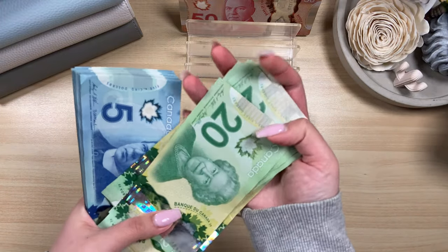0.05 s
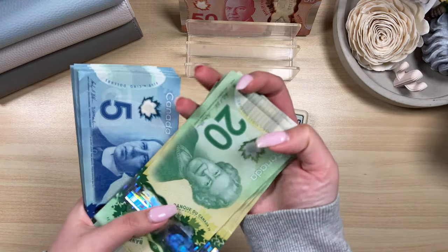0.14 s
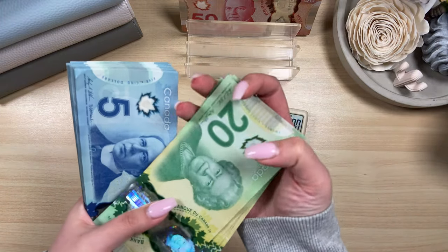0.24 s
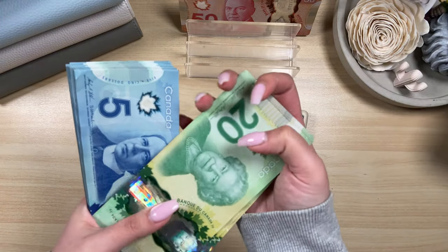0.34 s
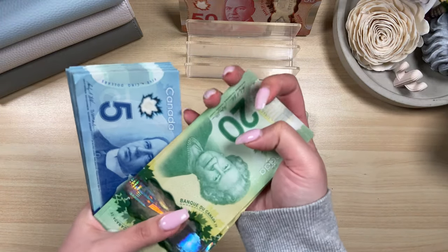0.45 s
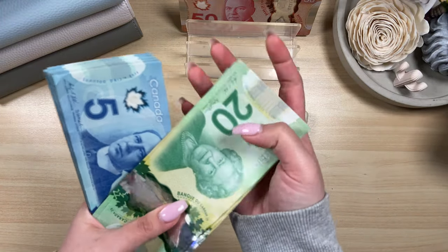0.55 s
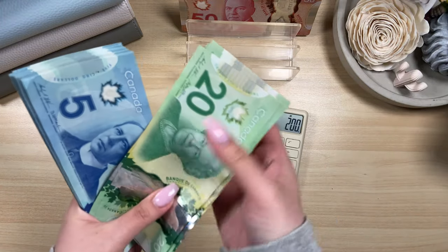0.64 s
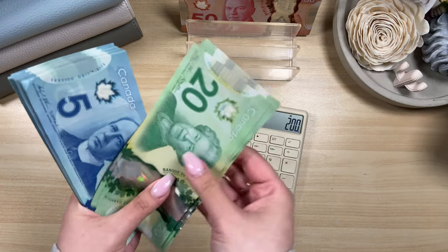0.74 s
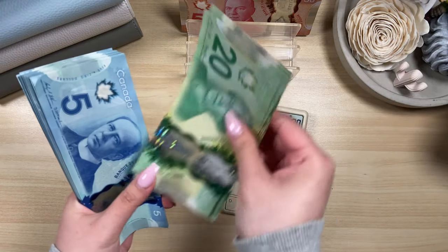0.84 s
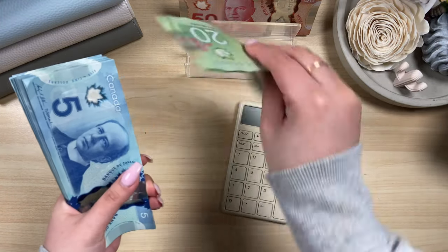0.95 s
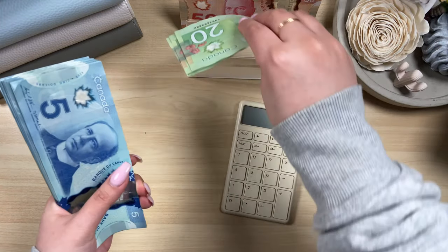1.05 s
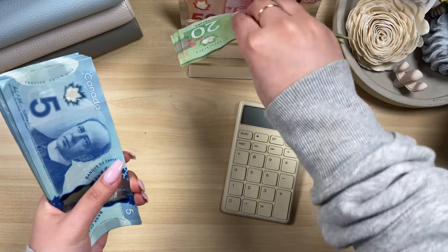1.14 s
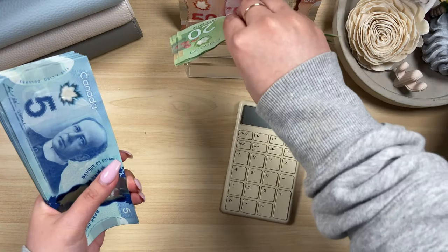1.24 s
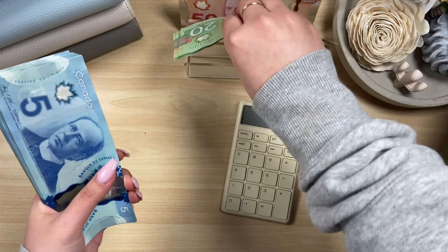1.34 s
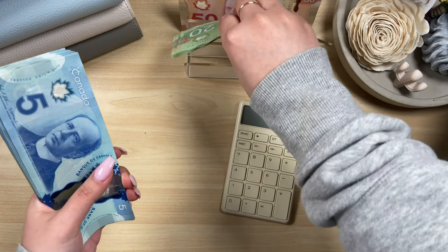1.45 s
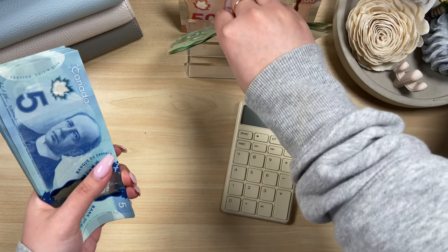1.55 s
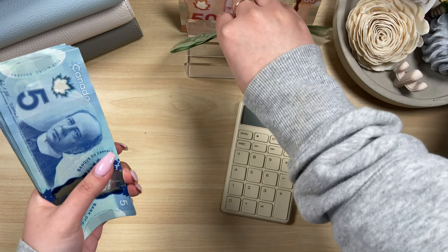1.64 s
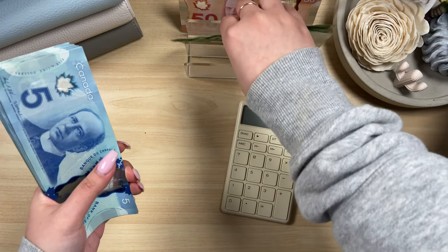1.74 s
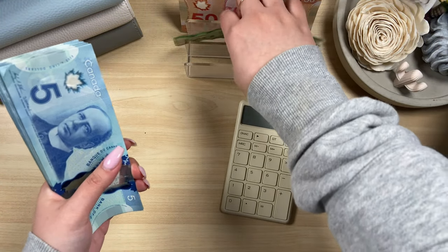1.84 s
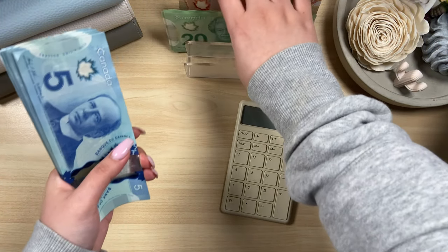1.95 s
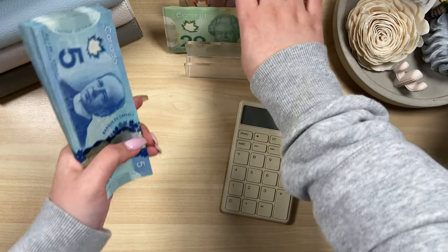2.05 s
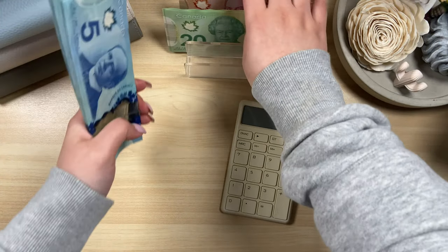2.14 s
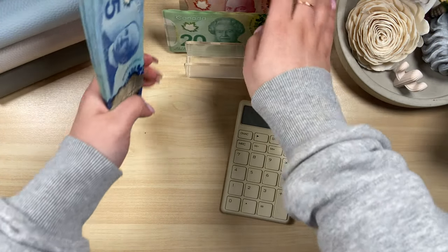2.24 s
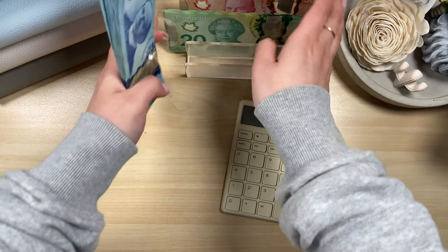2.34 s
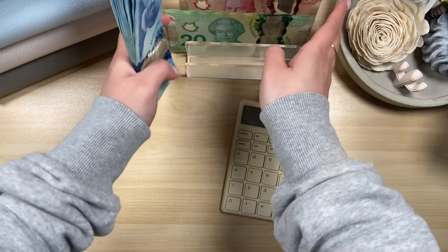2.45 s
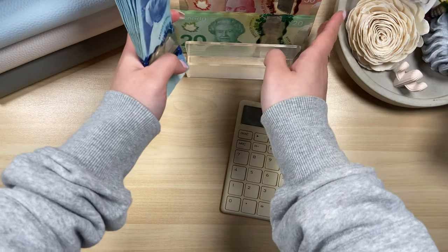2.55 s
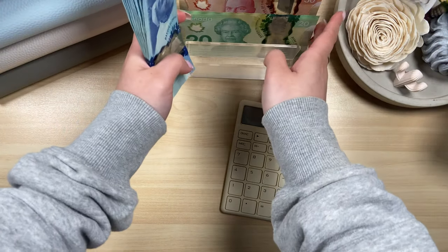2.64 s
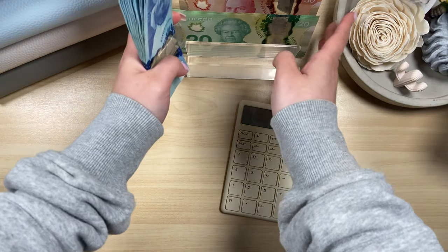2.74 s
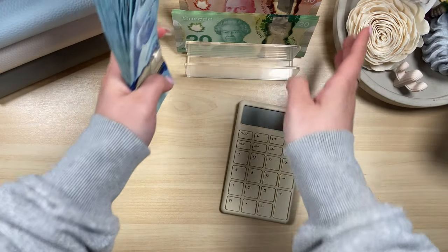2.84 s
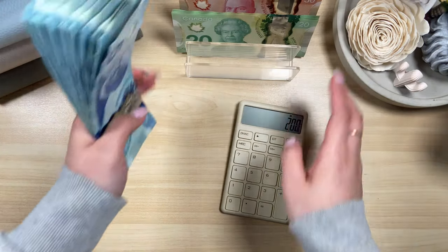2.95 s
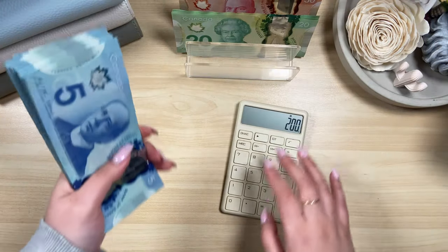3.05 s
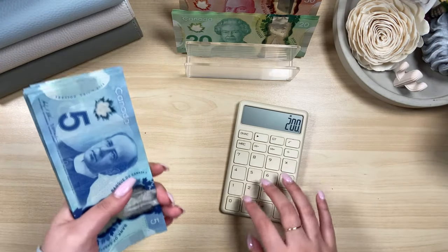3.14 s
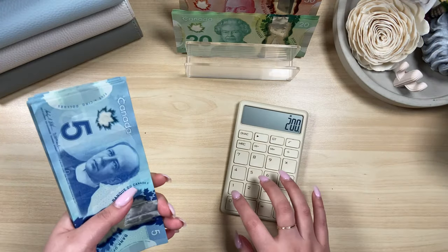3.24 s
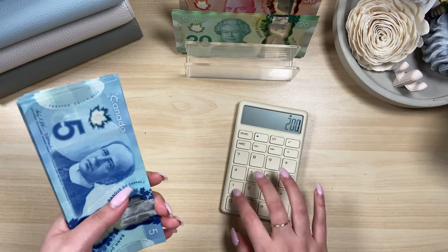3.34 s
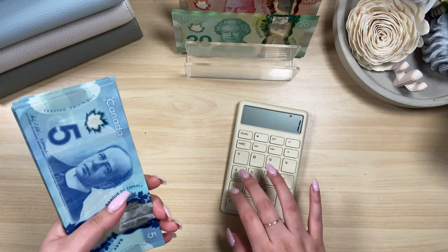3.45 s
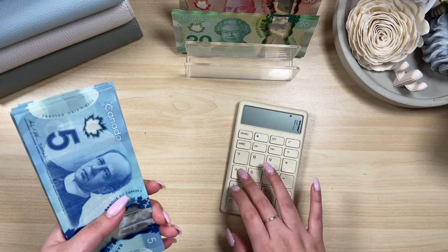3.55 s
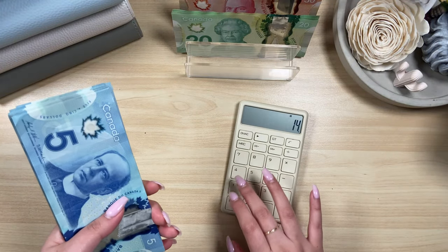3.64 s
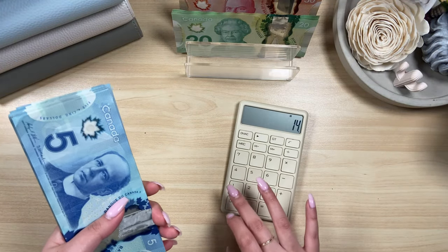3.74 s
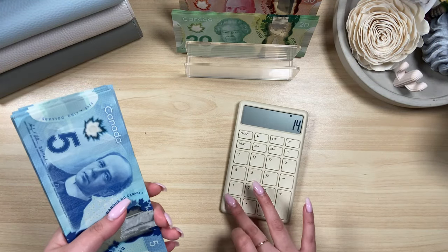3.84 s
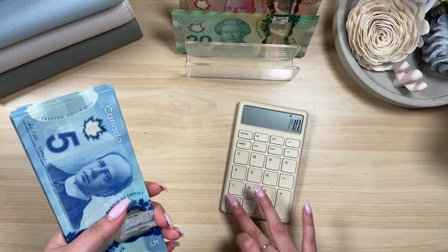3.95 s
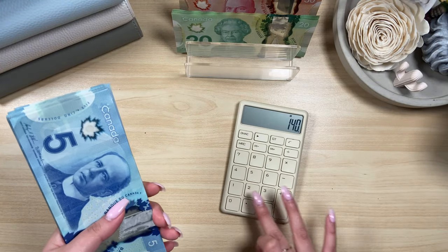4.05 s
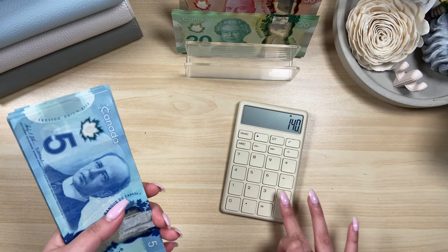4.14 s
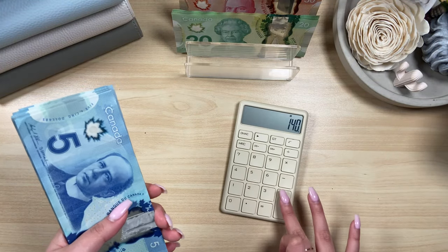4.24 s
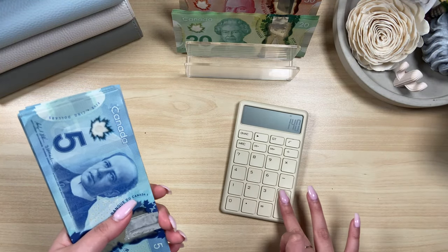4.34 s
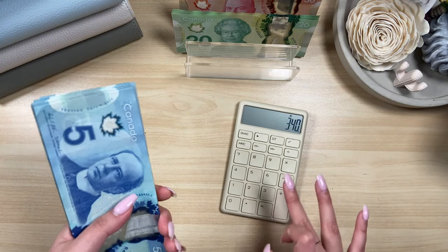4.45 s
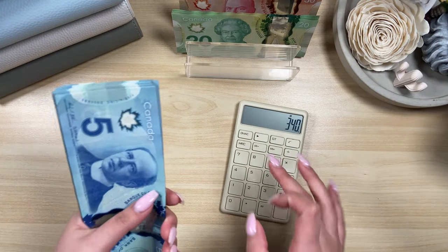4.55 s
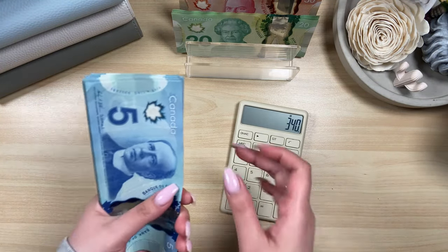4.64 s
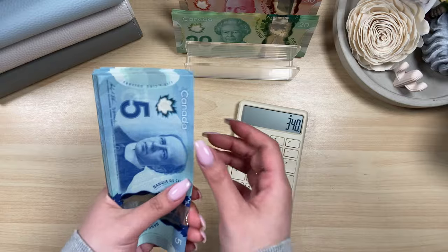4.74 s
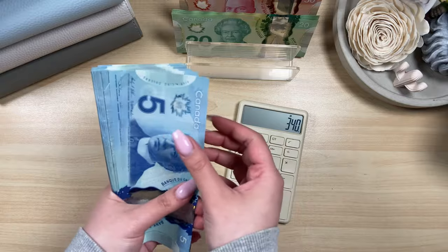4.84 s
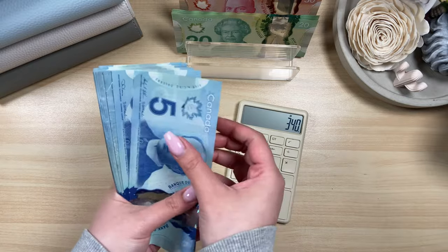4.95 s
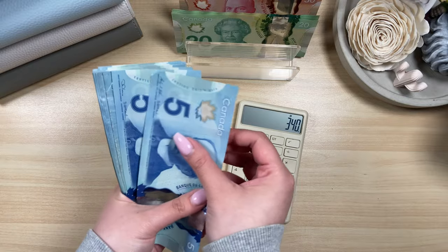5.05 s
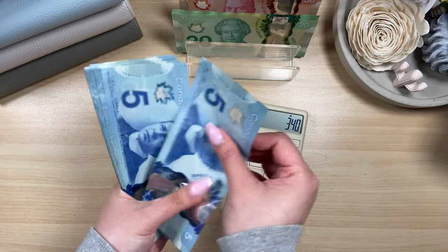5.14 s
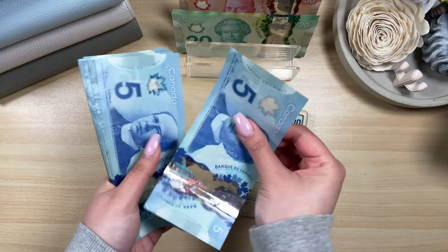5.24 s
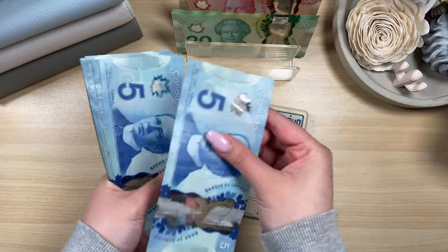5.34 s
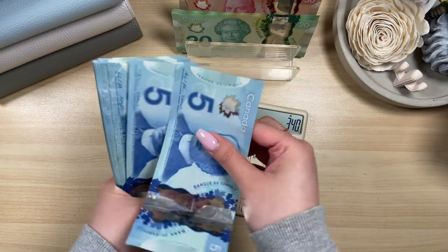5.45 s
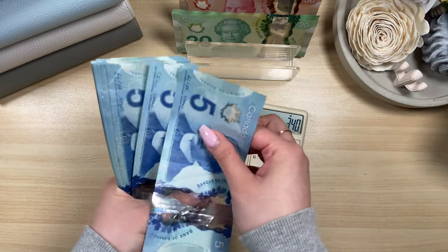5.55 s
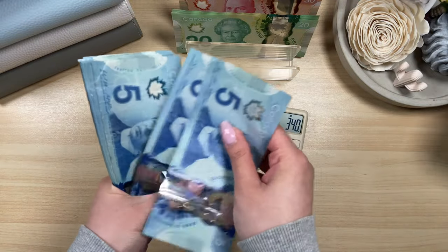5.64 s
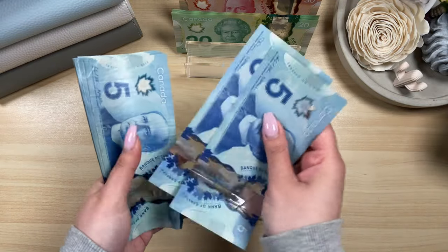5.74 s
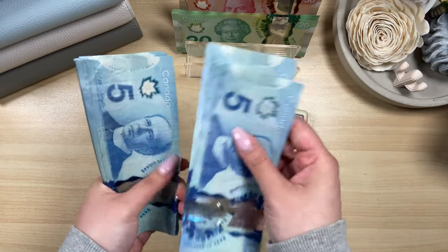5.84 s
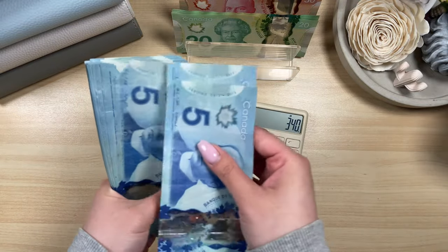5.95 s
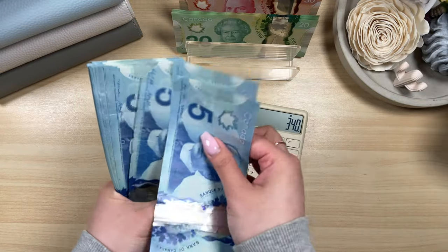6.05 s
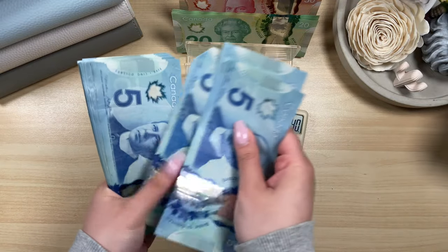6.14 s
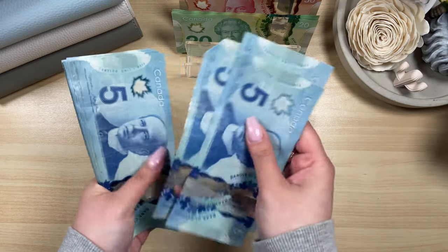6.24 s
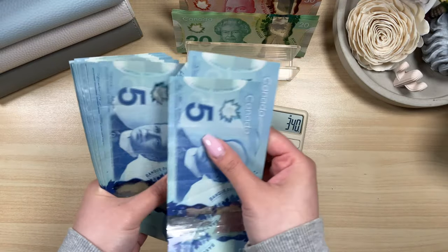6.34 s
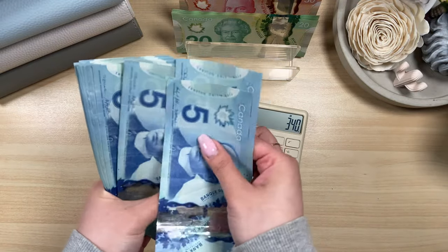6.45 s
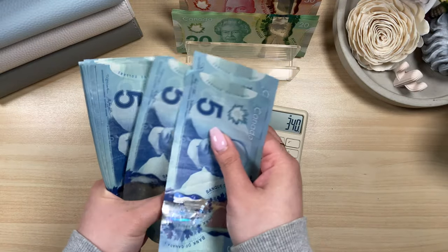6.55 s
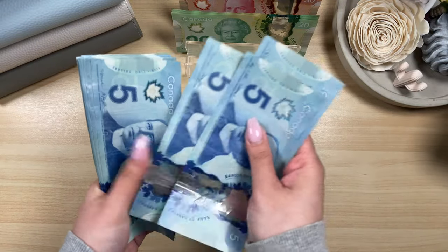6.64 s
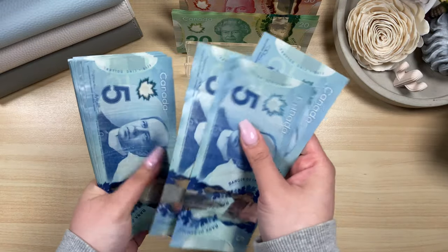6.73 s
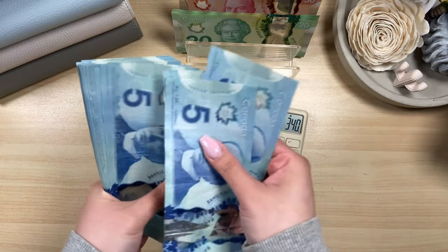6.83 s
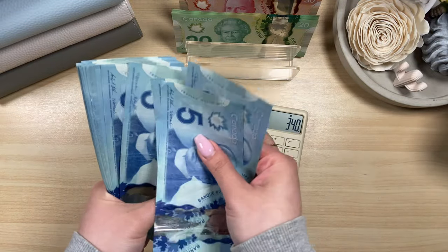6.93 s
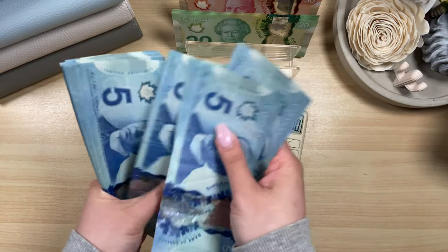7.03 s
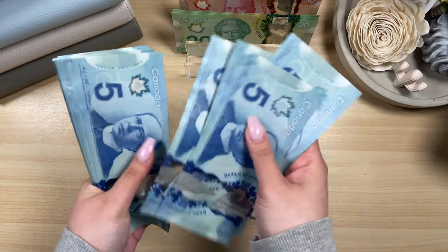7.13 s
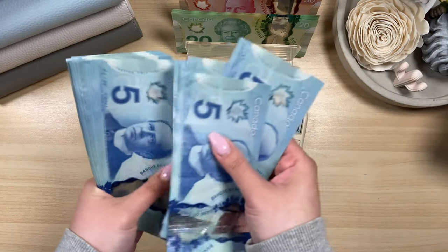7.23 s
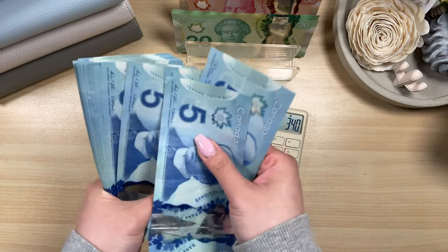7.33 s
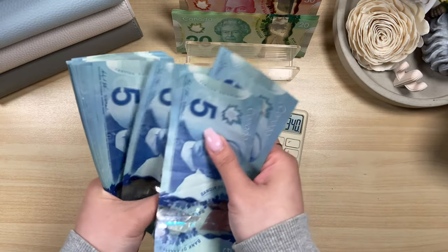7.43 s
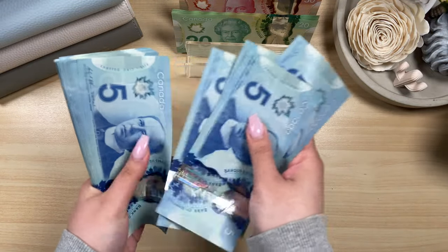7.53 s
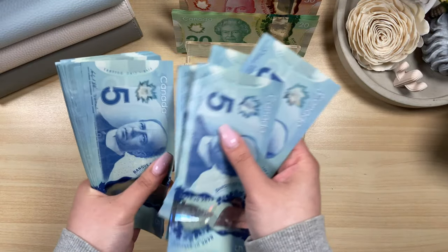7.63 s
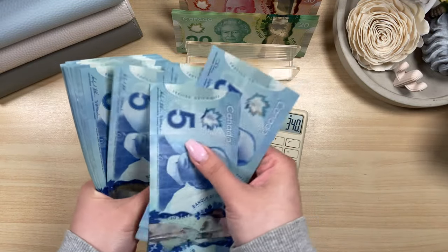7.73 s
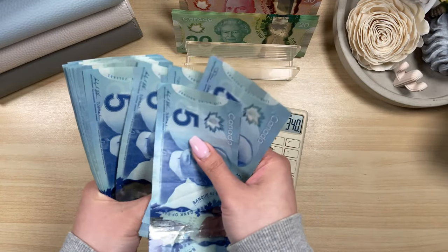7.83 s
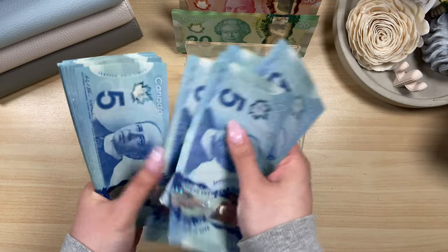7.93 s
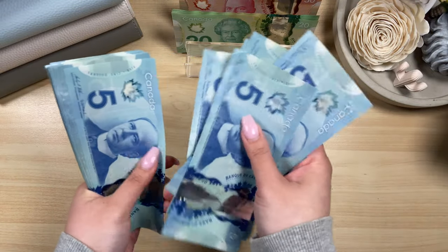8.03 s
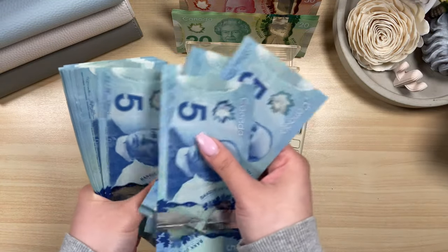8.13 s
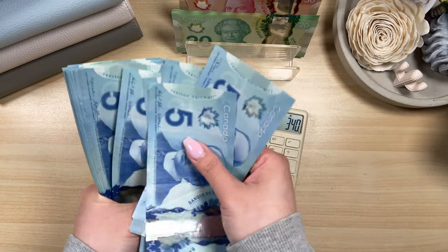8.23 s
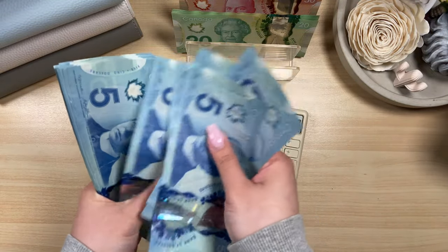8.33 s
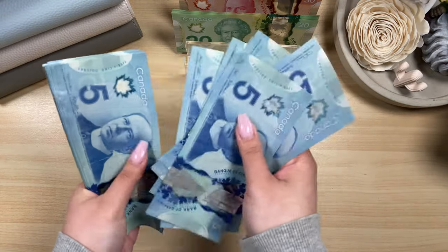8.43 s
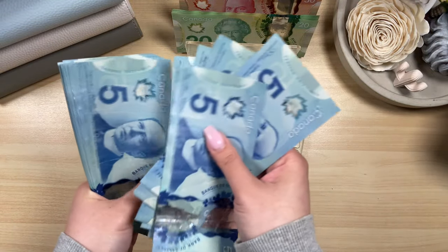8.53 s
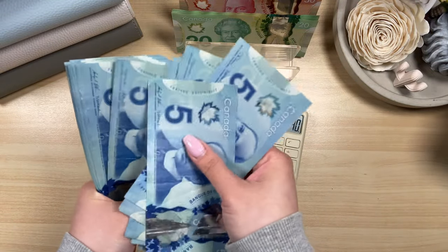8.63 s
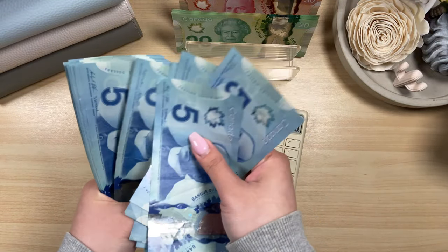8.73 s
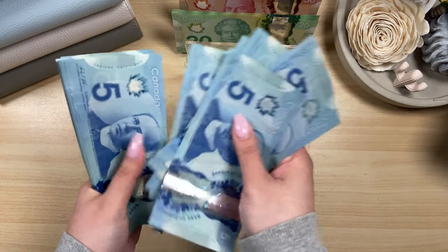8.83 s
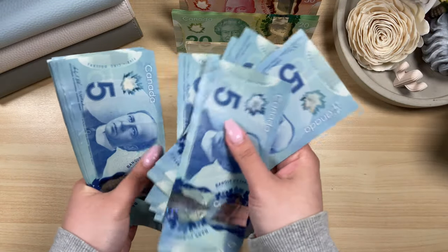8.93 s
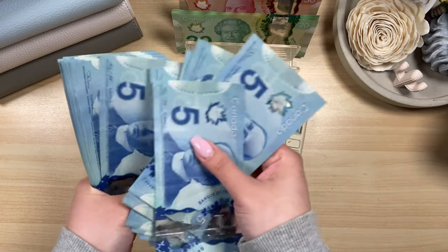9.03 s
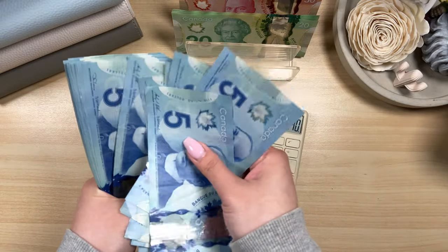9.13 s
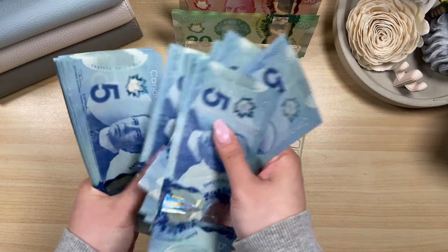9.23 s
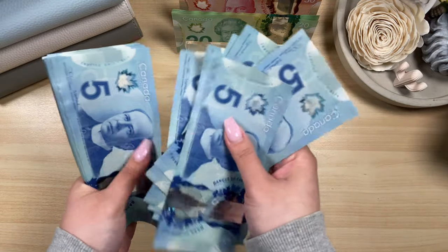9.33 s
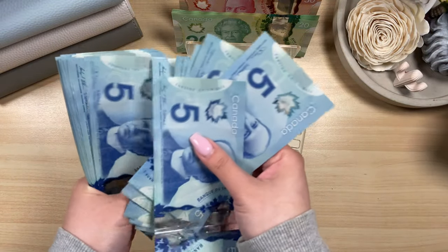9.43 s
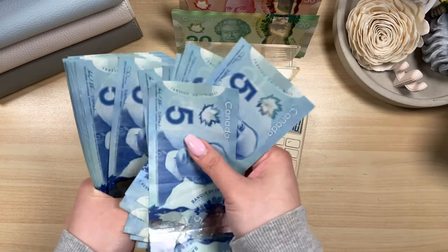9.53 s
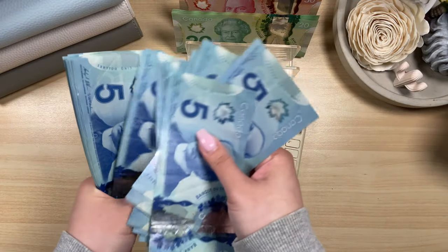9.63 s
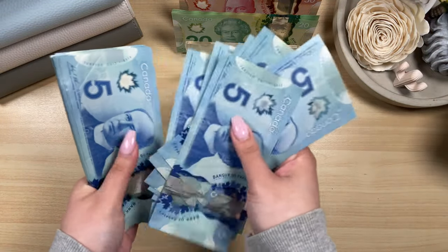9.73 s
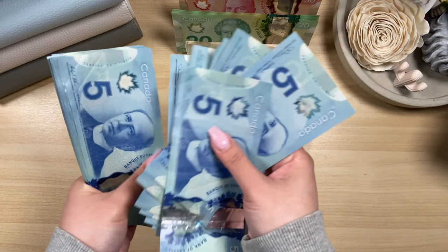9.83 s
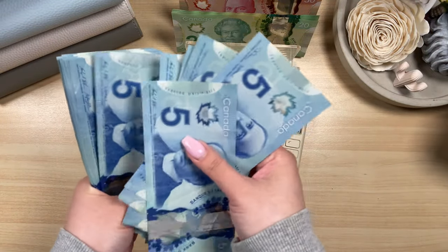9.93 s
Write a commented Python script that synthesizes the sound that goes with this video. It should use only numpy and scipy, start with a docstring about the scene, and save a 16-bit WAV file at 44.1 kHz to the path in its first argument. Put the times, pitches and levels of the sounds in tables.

```python
"""Counting plastic banknotes at a desk

Hands count plastic banknotes over a wooden desk under a phone. The notes slide (flickering noise), crackle
(random ticks), snap and flap (short noise bursts with a crack). A bundle knocks into a clear plastic rack and
fingernails tap calculator keys: bursts that ring decaying modes. A low wavering hum and faint air fill the room.
"""
import sys
import numpy as np
from scipy import signal
from scipy.fft import rfft, irfft, next_fast_len
from scipy.io import wavfile
from scipy.ndimage import uniform_filter1d

SR = 44100
rng = np.random.default_rng(int(sys.argv[2]) if len(sys.argv) > 2 else 0)


def digitize_waveform(pressure):
    """Quantize a signal to 16-bit integers and store it at the path in sys.argv[1].

    Rows of a 2-D input are taken as channels; values are limited to [-1, 1].
    """
    field = np.atleast_2d(pressure).T
    bounded = np.clip(field, -1, 1)
    quanta = np.round(bounded * 32767).astype(np.int16)
    wavfile.write(sys.argv[1], SR, quanta)


N = 440118


def undb(db):
    """Decibels to an amplitude factor."""
    return 10 ** (np.asarray(db) / 20)


def unit(x):
    """Scale to an rms of 1."""
    return x / np.sqrt(np.mean(x ** 2))


def band(x, lo_hz, hi_hz, order=2):
    """Butterworth band-pass."""
    return signal.sosfilt(signal.butter(order, [lo_hz, hi_hz], "band", fs=SR, output="sos"), x)


def walk(rate):
    """Random drift around zero, with a new target `rate` times a second and straight ramps between."""
    hold = int(SR / rate)
    targets = rng.standard_normal(N // hold + 1)
    return 2.0 * uniform_filter1d(np.repeat(targets, hold), hold)[:N]


def columns(table):
    """Curves, one per column after the time, read at every sample."""
    time_s, *curves = np.transpose(table)
    return [np.interp(np.arange(N) / SR, time_s, curve) for curve in curves]


def window(hz, lo_hz, hi_hz, sharp=np.sqrt(.5)):
    """Response of a causal band-pass, 12 dB an octave on each side; sharp edges resonate."""
    low, high = 1j * hz / hi_hz, lo_hz / (1j * hz)
    return 1 / ((1 + low / sharp + low ** 2) * (1 + high / sharp + high ** 2))


def place(x, pan_db):
    """A source left or right of the phone; pan_db is left minus right."""
    return x * undb(np.array([[pan_db], [-pan_db]]) / 2)


def blows(table, spread, edge_hz, edge_slow, crack_db, modes=(), ring_db=0, detune=0, sharp=0.56, sweep_ms=0):
    """Each row: a noise burst that builds up, cracks and dies, a second band at the edge, and a ringing body."""
    size, lead = 4096, 768  # samples in a burst, and samples ahead of its peak
    spot_db_per_octave = 16  # modes fade with distance from the favoured pitch
    pan_spread_db, lag_spread_s = 1.45, 10e-6 / 1.2  # left against right, drawn once per burst
    time_s, db, hz, edge_db, rise_ms, fall_ms, *spot = np.transpose(table)[:, :, None]
    spot_db, spot_hz = spot or (0, hz)
    count = len(table)
    t = (np.arange(size) - lead) / SR
    bins = (np.arange(size // 2 + 1) + 1e-3) * SR / size  # Hz, kept off zero
    click = rfft(np.where(np.arange(size) == lead, undb(crack_db), 0))  # the sharp instant of the burst

    def part(gain, slow, growth_db):
        """One band of noise and click: growth_db over the build-up, then 60 dB lost over slow * fall_ms."""
        growth = 1000 * growth_db * t / rise_ms
        fall = -60 * 1000 * t / (fall_ms * slow)
        hiss = irfft(rfft(rng.standard_normal((count, size))) * gain)
        return (hiss * undb(np.where(t < 0, growth, fall)) + irfft(click * gain)) / hiss.std(axis=1, keepdims=True)

    y = part(window(bins, hz / spread, hz * spread, sharp), slow=0.59, growth_db=8.455)
    y += undb(edge_db) * part(window(bins, *edge_hz), edge_slow, growth_db=23.75)
    for mode_hz, mode_db, ring_s in modes:
        level_chance, pitch_chance = rng.standard_normal((2, count, 1))
        distance_db = spot_db_per_octave * abs(np.log2(mode_hz / spot_hz))
        struck_db = ring_db + spot_db + mode_db + 1.3 * level_chance - distance_db
        ring = np.sin(2 * np.pi * mode_hz * (1 + detune * pitch_chance) * t) * (t > 0)
        y += undb(struck_db - 60 * t / ring_s) * ring
    fade = np.clip(np.minimum((t - t[0]) / 0.0096, (t[-1] - t) / .02), 0, 1)
    y = undb(db) * y * fade

    side = rng.standard_normal((count, 1)) * np.array([1, -1])[:, None, None]
    # dispersion: against the centre pitch, lower tones arrive late and higher ones early
    late = np.exp(-2j * np.pi * sweep_ms / 1000 * (2 * np.sqrt(hz * bins) - bins))
    lag = np.exp(1j * np.pi * bins * lag_spread_s * side)
    y = irfft(rfft(y) * late * undb(pan_spread_db * side / 2) * lag)
    out = np.zeros((2, N + size))
    for k, start in enumerate((time_s[:, 0] * SR).astype(int) - lead):
        out[:, start:start + size] += y[:, k]
    return out[:, :N]


def tone(hz, waver_db):
    """A sine of rms near 1 whose level and pitch waver a little."""
    phase = 2 * np.pi * np.cumsum(hz * (1 + 0.0074 * walk(6.5))) / SR
    return np.sqrt(2) * undb(waver_db * walk(9.6)) * np.sin(phase)


def room():
    """Two low hums over rumble, nearly alike in both channels, and faint air noise mostly unlike in each."""
    # the floor sinks away before the first key: (time [s], hum level [dB], whirr level [dB], air level [dB])
    floor = [(0, -64, -68, -73.5), (.7, -63, -70, -82), (.8, -60.5, -63.5, -78), (1.3, -64.5, -72.5, -83),
             (2, -63, -62, -79), (2.75, -64.5, -73, -81.5), (2.92, -70.5, -75.5, -78.5),
             (3.1, -90.5, -96.5, -81), (3.3, -107.5, -98, -83), (3.36, -71.5, -60, -86),
             (3.55, -62, -70, -80), (3.84, -77.5, -91, -82.5), (3.89, -74, -62, -74.5),
             (4.0, -76.5, -81, -75), (4.1, -72, -69, -86), (4.4, -67, -67, -74.5), (4.7, -67.5, -72.5, -79),
             (5.2, -63.5, -65, -87), (6.1, -64, -68.5, -88), (8.3, -65.5, -66, -86), (9.98, -66, -72, -88)]
    # overtones of the hum: (frequency [Hz], level against the hum [dB])
    overtones = [(118.6, -17.5), (593, -40)]
    hum_hz, whirr_hz = 59.3, 148
    hum_db, whirr_db, air_db = columns(floor)
    hum = tone(hum_hz, waver_db=0.5)
    hum = hum + sum(undb(db) * tone(hz, waver_db=4.5) for hz, db in overtones)
    rumble = unit(band(rng.standard_normal((2, N)), 42, 135, order=3))
    hum = hum + undb(-5.0) * rumble[0]
    hum = hum + undb(-14.0) * rumble[1] * np.array([[1], [-1]])  # opposite in the two channels

    low_air = unit(band(rng.standard_normal((2, N)), 450, 3300))
    high_air = unit(band(rng.standard_normal((2, N)), 2600, 5900))
    sink_db = np.minimum(0, 0.54 * (hum_db + 71))  # the lower air sinks with the hum
    air = undb(sink_db - 2.5) * low_air + undb(-4.5) * high_air
    narrow_air = unit(band(rng.standard_normal(N), 530, 580))  # same in both channels, does not sink with the hum
    air += undb(-12.0 + 2.2 * walk(15)) * narrow_air
    return undb(hum_db) * hum + undb(whirr_db) * tone(whirr_hz, waver_db=1.3) + undb(air_db) * air


def rack():
    """Knocks on clear plastic: bright bursts ring its upper modes, thuds ring its base."""
    # knocks against the rack, and the ringing that follows: (peak time [s], level [dB], centre [Hz],
    # sizzle against centre [dB], build-up scale [ms], fall scale [ms], ring level [dB], favoured pitch [Hz])
    knocks = [(1.429, -36, 1980, -34, .6, 21, 2, 1900), (1.436, -30.5, 2200, -7.5, 1.3, 14, 1.5, 2360),
              (1.467, -63, 2360, -29, 1.7, 37, 0, 2600), (1.487, -59, 2400, -25, 3, 60, 1, 2600),
              (1.504, -57, 1500, -25, 3, 60, 4, 1100), (1.518, -46, 2700, -27, 1.5, 25, 4.5, 2830),
              (1.541, -50.5, 1800, -25, 1.7, 30, -6, 1900), (1.547, -48, 2350, -5.5, 1.5, 40, 0, 3980),
              (1.889, -27, 3240, 7.5, .6, 62.2, -2, 3070), (1.908, -25, 2240, -1.5, .8, 37, 2, 1730),
              (1.917, -27.5, 2700, -7, 1.5, 30, -2, 4200), (1.926, -34.5, 2400, 3.5, 1.5, 30, -1, 2400),
              (1.937, -25, 2350, -14, 1.1, 52, 5, 2610), (1.944, -32, 2500, -4.5, 1.5, 47, 1.5, 2500),
              (2.001, -34, 3000, -3.5, .6, 50, 1, 3320), (2.013, -33.5, 2280, -9.5, 1.5, 54, 0, 1700),
              (2.674, -51, 2680, 1.5, 2.5, 45, 3.5, 2700), (2.695, -53.5, 2490, -1, 2.9, 45, 3, 2500)]
    # weight of the bundle on the rack: (peak time [s], level [dB], centre [Hz], deep part against centre [dB],
    # build-up scale [ms], fall scale [ms])
    thuds = [(1.431, -40, 484, -40, 1.5, 22), (1.441, -41, 466, -41, 1.7, 34), (1.45, -42, 467, -39, 3, 14),
             (1.5, -55, 470, -27, 4, 45), (1.52, -49.5, 510, -27, 3.3, 32), (1.55, -53.5, 500, -3, 3.9, 98),
             (1.914, -40, 480, -22.5, 2.1, 20), (1.923, -33.5, 494, -30, 4, 14),
             (1.949, -41.5, 450, 0, 3.2, 63), (1.895, -44, 418, -25, 2.6, 22),
             (1.995, -54, 140, -2.5, 7.7, 440), (2.632, -57, 480, -18, 2, 35)]
    # modes of the rack: (frequency [Hz], level [dB], t60 [s])
    rack_modes = [(977, -3, .07), (1143, -2.5, 0.08), (1700, -12, 0.066), (4240, -12, .04),
                  (1430, -7, 0.043), (1903, -9, 0.04), (2207, -4.5, 0.04), (2370, -3, 0.075),
                  (2650, -12, 0.058), (2860, -6.5, 0.065), (3393, -6, 0.063), (4060, -13, 0.087),
                  (4874, -17.5, 0.058)]
    # modes of its base: (frequency [Hz], level [dB], t60 [s])
    base_modes = [(457, -1.5, 0.1), (500, -13, 0.19)]
    bright = blows(knocks, 1.15, (5500, 11500), edge_slow=0.59, crack_db=6.0,
                   modes=rack_modes, ring_db=0.5, detune=0.008, sharp=1.25)
    deep = blows(thuds, 1.5, (90, 150), edge_slow=2.4, crack_db=12.0,
                 modes=base_modes, ring_db=6.0, detune=0.0075, sharp=0.5)
    return place(bright + deep, pan_db=1)


def keys():
    """Nails tap calculator keys: touches and clicks ring the case, the finger's weight rings its base."""
    # finger touches, then keys going down and springing back: (peak time [s], level [dB], centre [Hz],
    # sizzle against centre [dB], build-up scale [ms], fall scale [ms], ring level [dB], favoured pitch [Hz])
    taps = [(3.325, -56.5, 4000, -8, 5, 33, -11, 4300), (3.332, -30.5, 4280, 6.5, 1.4, 20, -2, 1710),
            (3.337, -35, 4300, 0, 1.5, 22, 8.5, 4300), (3.407, -44, 2870, -1, 1.2, 20, -4, 2800),
            (3.425, -35.5, 2870, 1, 2.7, 37, 1, 2320), (3.506, -56, 3000, -1, 4.1, 30, -7, 2900),
            (3.513, -26.5, 4440, 10, 0.52, 7.2, -6.5, 4300), (3.517, -30, 2720, -10, 2.1, 64, -1, 2500),
            (3.595, -61, 2520, -8, 5.5, 30, -8.5, 2390), (3.602, -36.5, 2970, -2.5, 0.76, 35, 2, 2140),
            (3.608, -35.5, 2920, -11, 2.2, 26, -1, 2900), (3.879, -37, 3830, -4.5, 1.4, 45, 2, 4200),
            (3.885, -44.5, 2340, -13, 1.1, 32, 3.5, 2200), (3.96, -36.5, 3440, -4.5, 1.9, 23, 2, 4400),
            (3.967, -36, 2800, -12, 0.86, 20, 4.5, 2430), (4.288, -63.5, 3800, -6.5, 4.2, 36, -13.5, 3700),
            (4.3, -28, 3520, -5, 1.9, 22, 0, 3420), (4.387, -34, 3330, -4, 2.2, 12, 8, 3200),
            (4.399, -32, 2560, -1, 0.84, 13, -9, 2400)]
    # weight of the finger on the calculator: (peak time [s], level [dB], centre [Hz], deep part against
    # centre [dB], build-up scale [ms], fall scale [ms], ring level [dB], favoured pitch [Hz])
    thuds = [(3.347, -44.5, 140, -2.5, 5.5, 140, -8, 300), (3.338, -50.5, 149, -1, 3.0, 59.4, 3, 400),
             (3.35, -49.5, 400, -21, 5, 60, 4, 400), (3.435, -66, 500, 2.5, 3.3, 34.7, 3, 500),
             (3.525, -57, 524, -7.5, 1.8, 30, -1, 540), (3.55, -61, 520, -9, 3, 28, -2, 538),
             (3.585, -64.5, 450, -9, 3, 30, 0, 450), (3.612, -50, 570, -12, 4.6, 31, 0, 570),
             (3.889, -55, 450, -8, 1.5, 80, 1.5, 470), (3.981, -52, 500, -8.5, 8, 51, -0.5, 520),
             (4.308, -49.5, 464, -4, 6.8, 80, 0, 440), (4.404, -41.5, 537, -5.5, 9.1, 36, -1, 544)]
    # modes of the case: (frequency [Hz], level [dB], t60 [s])
    case_modes = [(1010, -6.5, .07), (1542, -8, 0.07), (2075, -7.5, 0.06), (3520, -15, .05),
                  (4020, -10, .06), (2390, -0.5, 0.025), (2650, -13, 0.048), (2900, -12.5, .06),
                  (3220, -12, 0.044), (3700, -18, 0.035), (4390, -1.5, 0.027), (4780, -17, 0.04),
                  (8730, 10.5, .015)]
    # modes of its base: (frequency [Hz], level [dB], t60 [s])
    base_modes = [(340, -3.5, 0.039), (457, -1.5, .09), (557, 4.5, 0.06)]
    bright = blows(taps, 1.0, (5500, 9200), edge_slow=0.74, crack_db=7.0,
                   modes=case_modes, ring_db=-4.5, detune=0.014, sharp=0.95)
    deep = blows(thuds, 1.0, (90, 200), edge_slow=3.5, crack_db=9.0,
                 modes=base_modes, ring_db=0.0, detune=0.025, sharp=1.6)
    return place(bright + deep, pan_db=0.9)


def sheet(lo_hz, hi_hz, rate, share, shift_db, count=5):
    """Patches of sheet, each rubbed and slipping on its own, so that the colour keeps shifting."""
    out, step = 0, (hi_hz / lo_hz) ** (1 / count)
    for k in range(count):
        where, size = rng.random((int(rate * N / SR), 2)).T  # rate: slips per second
        slip_db = np.minimum(-3.5 * np.log(size), 11)  # many small slips, few large
        slips = np.bincount((where * N).astype(int), undb(slip_db), N)
        drive = rng.standard_normal(N) + share * unit(slips)
        drive = drive + 0.044 * rng.standard_normal(N) * np.array([[1], [-1]])  # slight stereo width
        patch = unit(band(drive, lo_hz * step ** k, lo_hz * step ** (k + 1), order=1))
        out = out + undb(shift_db * walk(22)) * patch
    return unit(out)


def crackle():
    """Creases popping at random: short ticks, each patch of sheet with its own pitch."""
    ticks_per_s, scatter_db = 50, 4.  # for each patch
    out = 0
    for hz in (700, 1100, 1700, 2600, 4000):
        where, size = rng.random((2, N))
        tick_db = np.minimum(-scatter_db * np.log(size), 13)
        ticks = (where < ticks_per_s / SR) * undb(tick_db)
        out = out + unit(band(ticks, hz / 1.6, hz * 1.6, order=1))
    return unit(out)


def slide():
    """Friction hiss, rustle and flutter that flicker together and swell with every stroke."""
    # changing background friction of the handled notes, with short pauses:
    # (time [s], hiss level [dB], rustle level [dB], flutter level [dB])
    background = [(0, -82, -70.5, -85), (.7, -90, -85.5, -84), (.9, -88, -82.5, -83),
                  (1.22, -93, -94, -87.5), (1.32, -102, -95, -88), (1.7, -86.5, -83, -84),
                  (2.05, -84.5, -68.5, -68), (2.27, -88, -75, -75), (2.33, -93, -89, -89),
                  (2.5, -100, -93, -89), (3.05, -100, -95, -96), (3.3, -105, -100, -105),
                  (3.4, -105, -93, -96.5), (4.5, -100, -85, -82.5), (4.8, -81, -75.5, -66),
                  (5.0, -66, -56, -98), (5.4, -78, -68, -98), (5.6, -68, -48.5, -56), (5.9, -55, -57, -59),
                  (5.94, -80, -74, -78), (5.97, -64, -60, -64), (7, -73.5, -60, -69), (8.6, -61, -57, -73),
                  (8.65, -68, -62, -64), (8.7, -64.5, -56, -68), (9.4, -60.5, -55.5, -64),
                  (9.44, -68, -65, -81), (9.47, -83, -67, -65.5), (9.98, -60, -54.5, -67.5)]
    # a note is pushed by the thumb or pulled off the bundle:
    # (peak time [s], hiss level [dB], rustle level [dB], flutter level [dB], length [s])
    strokes = [(0.142, -59.5, -59.5, -63.5, 0.14), (0.314, -84, -79, -94, 0.11),
               (0.46, -75, -76, -73, 0.074), (0.59, -75, -76, -83, 0.092), (0.784, -62.5, -59, -58, 0.052),
               (1.479, -86, -62, -50, 0.067), (1.837, -75, -70.5, -94, 0.088),
               (1.939, -51, -36, -48, 0.071), (2.104, -83, -74, -66, 0.086),
               (2.236, -87.5, -81.5, -101, 0.0505), (2.611, -67, -70.5, -64, 0.045),
               (2.678, -98, -64, -70.5, 0.053), (3.036, -84, -81, -102, 0.25),
               (4.886, -82.5, -66, -94.5, 0.097), (5.081, -65.5, -53, -54.5, 0.19),
               (5.173, -40, -49, -38.5, 0.086), (5.35, -69, -57, -77, .05),
               (5.5, -50.5, -50.5, -52.5, 0.088), (5.671, -40, -46, -37, 0.059),
               (5.763, -46, -50, -68, 0.045), (5.85, -60, -71, -65, 0.071), (6.014, -65, -57, -59, 0.11),
               (6.142, -43.5, -38, -39, 0.07), (6.358, -56.5, -57, -85, 0.14),
               (6.61, -49, -48.5, -43, 0.12), (6.798, -50.5, -48, -83, 0.068),
               (6.902, -57.5, -52.5, -71, 0.085), (7.052, -49.5, -45.5, -42, 0.11),
               (7.13, -61, -50, -40, 0.044), (7.224, -57.5, -63, -91, 0.18), (7.38, -63, -57, -57, 0.27),
               (7.487, -44, -43, -39, 0.074), (7.718, -54, -49, -53, 0.23), (7.913, -45, -45.5, -41, 0.051),
               (8.07, -66, -80, -59, 0.5), (8.361, -52.5, -53, -42.5, 0.12), (8.59, -57, -70, -64, 0.04),
               (8.802, -48, -45, -39.5, 0.1), (8.965, -61, -57, -92, 0.049),
               (9.238, -48, -47, -37.5, 0.054), (9.389, -54, -60, -84, 0.023), (9.526, -61, -51, -64, 0.19),
               (9.676, -47, -49, -45, 0.081), (9.869, -57, -84, -93, 0.11)]
    rise_db, fall_db = 30.5, 28.5  # gained over one length before the peak, lost over one length after it
    flutter_lag_s = 0.031  # the sheet flutters as it comes free
    t, levels = np.arange(0, N, 32) / SR, []  # a coarse clock is enough for levels
    time_s, *peaks_db, length = np.transpose(strokes)[:, :, None]
    for background_db, peak_db, lag in zip(columns(background), peaks_db, (0, 0, flutter_lag_s)):
        u = (t - time_s - lag) / length
        swell = undb(peak_db + np.minimum(rise_db * u, -fall_db * u)).sum(axis=0)
        levels.append(undb(background_db) + np.interp(np.arange(N) / SR, t, swell))
    hiss_level, rustle_level, flutter_level = levels
    hiss = hiss_level * undb(6.5) * sheet(5520, 14300, rate=230, share=0.75, shift_db=1.7, count=3)
    rustle = rustle_level * sheet(1400, 5900, rate=63, share=0.37, shift_db=2.6, count=10)
    rustle = rustle + rustle_level * undb(-7.5) * crackle()
    loose_sheet = sheet(180, 960, rate=40, share=0.97, shift_db=3.5, count=4)
    flutter = flutter_level * band(loose_sheet, 250, 2200)
    return undb(1.0 * walk(30)) * (hiss + rustle + flutter)


def scatter(count, low, high):
    """Rows at random moments of the counting, every column between its low and high value."""
    start_s, end_s = 4.95, 9.9
    low, high = np.array([start_s, *low]), np.array([end_s, *high])
    return low + (high - low) * rng.random((count, len(low)))


def noise_tones():
    """Short narrow-band noise tones within the rustle: bursts through a resonant band."""
    # (peak time [s], level [dB], centre [Hz], build-up scale [ms], fall scale [ms])
    placed = [(.3, -73, 2310, 9, 200), (.22, -60, 1410, 6, 64), (2.089, -60, 1430, 5.8, 110),
              (2.12, -66, 2700, 5.9, 230), (2.6, -66.5, 2400, 9, 140), (3.015, -69.5, 2090, 4.6, 110),
              (5.381, -55, 1890, 6, 60), (5.543, -52, 1790, 6, 67), (6.026, -62, 1900, 5.5, 60),
              (6.471, -55, 1650, 8, 60), (6.517, -66, 1590, 4, 56), (6.556, -60, 1600, 5, 60),
              (6.57, -57, 2170, 5, 60), (8.052, -60, 1900, 6, 60), (8.116, -57, 1860, 6.7, 42),
              (8.34, -42, 3220, 9, 120), (8.38, -46, 3200, 9, 120), (8.785, -51, 3250, 9, 160),
              (8.85, -47, 3100, 9, 110), (8.966, -56, 1700, 6, 89), (9.04, -66, 2970, 9, 300),
              (9.365, -56, 1780, 3.3, 72), (9.385, -52, 2900, 6, 90), (9.22, -47, 3300, 9, 150),
              (9.64, -46, 3340, 12, 160), (9.68, -44.5, 3300, 9, 270)]
    scattered = scatter(count=110, low=(-61, 1400, 17, 40), high=(-60.0, 6200, 11, 114))
    rows = np.insert(np.vstack([placed, scattered]), 3, -40, axis=1)  # hardly any sizzle
    return blows(rows, 1.0, (5500, 16500), edge_slow=.5, crack_db=-12, sharp=6.0)


def snaps():
    """A stiff note creases, buckles or flicks free: a hard crack with sizzle."""
    # (peak time [s], level [dB], centre [Hz], sizzle against centre [dB], fall scale [ms])
    clear = [(.131, -60, 3130, 4, 45), (.18, -47, 2490, 0, 22), (.213, -60.5, 2500, 4, 130),
             (.455, -68.5, 2420, 6, 120), (.562, -62, 2400, 2, 210), (.598, -60, 2110, 1, 89),
             (.748, -48.5, 1940, 4, 12), (.752, -51.5, 1800, 7, 38), (.798, -56.5, 2410, 9, 38),
             (.839, -64, 3800, 2, 28), (.929, -66.5, 2160, -1, 41), (2.227, -56.5, 2250, -8, 53),
             (2.251, -62, 2645, -21.5, 51), (2.578, -65.5, 1884, -1, 110), (2.629, -64, 2240, -8.5, 69),
             (2.861, -69, 2640, 9.5, 74), (3.025, -65.5, 2860, -8, 71), (4.509, -62, 4020, -2, 35),
             (4.7, -42, 4000, -23, 13), (4.804, -39, 2900, 8.5, 23), (4.981, -39, 1930, -35, 18),
             (5.027, -46, 2460, -16, 39), (5.112, -43, 3320, -2, 490), (5.145, -41, 2510, 9, 41),
             (5.175, -36, 1900, -10, 30), (5.213, -44, 2270, -12, 74), (5.229, -44.5, 2600, 1, 83),
             (5.26, -60, 1830, -15, 46), (5.594, -15.5, 4460, -3, 14), (5.598, -26, 3600, -8, 30),
             (5.645, -35, 2000, 0, 15), (5.665, -24.5, 2500, 2, 63), (5.676, -34, 2030, -16, 36),
             (5.685, -35.5, 1700, 6, 40), (5.719, -32, 2130, -9, 59), (5.734, -39, 3400, -10, 37),
             (5.803, -34, 2400, -20, 12), (5.861, -46, 2380, -12, 36), (5.951, -49.5, 2720, 4, 83),
             (6.136, -41, 2610, 3, 70), (6.146, -43, 2510, 6, 42), (6.17, -18.5, 3430, -8.5, 50),
             (6.219, -41, 2140, -13, 62), (6.266, -29, 1900, -28, 84), (6.462, -50, 3480, 6, 23),
             (6.609, -28, 3360, 5.5, 56), (6.618, -30.5, 2240, -18, 39), (6.633, -37.5, 1950, -16, 75),
             (6.663, -40.5, 1840, -19, 96), (6.701, -25.5, 2120, -23, 36), (6.923, -46.5, 2860, 1, 41),
             (6.982, -53, 1870, -20, 20), (7.032, -51, 2510, 9, 60), (7.055, -40.5, 2610, 7.5, 18),
             (7.073, -34, 3500, -20, 93), (7.137, -45, 2840, 5, 66), (7.169, -28.5, 2370, -23, 31),
             (7.185, -36.5, 2100, -4, 13), (7.401, -43.5, 2070, -2, 34), (7.488, -48, 2590, 9, 45),
             (7.505, -27, 1680, -26, 71), (7.519, -32.5, 2180, -15, 17), (7.56, -45.5, 3220, -7, 41),
             (7.594, -46.5, 2230, -1, 94), (7.681, -23.5, 3250, -2, 19), (7.89, -42.5, 3430, 0, 120),
             (7.935, -21.5, 3800, 3, 27), (7.948, -28, 1950, -7, 46), (7.999, -44, 2120, 4.5, 77),
             (8.103, -57.5, 4500, 13.5, 34), (8.154, -61, 4500, 10, 30), (8.202, -46.5, 2650, 1, 200),
             (8.241, -47, 3140, 1, 110), (8.294, -22, 2220, 3, 18.4), (8.354, -28, 2700, -18, 14),
             (8.363, -32.5, 2680, 7.5, 51), (8.389, -37, 2620, -13, 60), (8.418, -41, 2020, -14, 32),
             (8.437, -42, 1960, -19, 63), (8.618, -47, 2650, -13, 41), (8.668, -34, 2840, -25, 28),
             (8.728, -45, 1900, -15, 25), (8.743, -29.5, 2400, -17, 21), (8.784, -53, 1800, -15, 30),
             (8.8, -37, 1800, -19, 22), (8.818, -31.5, 2900, -8, 32), (8.829, -31.5, 2460, -21, 47),
             (8.876, -45, 1800, -10, 34), (8.89, -49, 2000, -13, 35), (9.103, -47.5, 4000, -10, 530),
             (9.161, -43, 2740, -6, 31), (9.211, -42.5, 3450, -14, 87), (9.234, -41, 2360, 6, 140),
             (9.258, -33, 2680, 4.5, 58), (9.284, -45, 2780, -13, 68), (9.318, -44, 2250, 0, 65),
             (9.46, -45, 5030, -4, 400), (9.527, -34, 2900, -29, 41), (9.58, -32.5, 2080, -3.5, 26),
             (9.613, -65, 1810, -26, 27), (9.659, -42.5, 3520, 3, 99), (9.677, -49, 3100, -11, 68),
             (9.711, -37, 2500, -14, 59), (9.745, -49, 2930, -16, 47), (9.825, -49.5, 2170, -1, 100),
             (9.842, -55, 4500, 4, 25)]
    faint = scatter(count=50, low=(-70, 1500, -12, 12), high=(-78, 4500, 18, 45))
    rows = np.vstack([clear, faint])
    rows = np.insert(rows, [4], 0.028 * rows[:, [4]], axis=1)  # build-up as a share of the fall scale
    return blows(rows, 1.1, (5500, 16500), edge_slow=0.32, crack_db=14.5, sharp=0.75, sweep_ms=.2)


def flaps():
    """A whole sheet flaps: bending waves bring its low tones late, and a brighter flap is a quicker one."""
    # (peak time [s], level [dB], centre [Hz], deep part against centre [dB])
    clear = [(.752, -48.5, 435, -3), (.805, -47, 377, -11), (2.64, -58, 470, -11), (2.69, -56.5, 430, -8),
             (4.985, -50.5, 474, -13), (5.058, -51, 590, -0.5), (5.147, -32.5, 760, -29),
             (5.176, -34, 700, -13), (5.194, -28, 660, -31), (5.215, -36, 420, -8.5),
             (5.238, -39, 600, -10), (5.265, -40.5, 495, -24), (5.325, -50.5, 307, -13),
             (5.596, -42, 710, -12), (5.667, -32, 650, -25), (5.678, -28.5, 420, -30),
             (5.686, -39, 700, -25), (5.695, -42, 346, -9), (5.708, -39, 600, -20), (5.716, -32, 423, -20),
             (5.804, -40, 545, -10.5), (6.017, -50, 750, -20), (6.04, -57, 330, -8),
             (6.087, -41.5, 530, -10), (6.149, -34.5, 590, -28), (6.172, -21.5, 682, -19),
             (6.228, -38, 400, -13), (6.273, -36, 474, -13), (6.459, -51, 550, -20),
             (6.473, -49, 320, -3.5), (6.527, -45.5, 557, -14), (6.552, -58, 800, -20),
             (6.609, -27, 715, -18), (6.644, -31.5, 424, -17), (6.674, -43, 290, -1.5),
             (6.705, -33, 576, -15), (6.777, -52.5, 330, -17), (6.958, -57, 330, -12),
             (6.984, -46.5, 410, -6), (7.057, -34, 457, -14), (7.075, -35, 620, -20), (7.146, -38, 394, -6),
             (7.186, -31.5, 430, -21), (7.341, -58, 330, -12), (7.403, -44.5, 576, -11),
             (7.491, -32.5, 480, -14), (7.507, -24.5, 747, -32), (7.52, -36.5, 462, -8.5),
             (7.573, -39, 376, -8), (7.84, -43.5, 694, -9.5), (7.941, -26.5, 530, -15.5),
             (7.998, -38, 433, -6.5), (8.209, -48.5, 750, -16), (8.298, -36, 425, -23),
             (8.366, -30.5, 640, -17.5), (8.393, -35.5, 605, -13), (8.439, -37.5, 595, -8.5),
             (8.477, -53, 310, -5), (8.502, -44, 425, -15), (8.621, -51, 350, -21), (8.664, -47, 795, -13),
             (8.728, -49, 596, -15), (8.746, -32, 786, -21), (8.785, -50, 400, -20), (8.801, -37, 500, -22),
             (8.807, -41, 383, -25), (8.82, -41, 400, -22), (8.834, -37, 330, -20), (8.829, -36, 445, -10),
             (9.09, -55, 600, -9), (9.165, -40, 530, -14), (9.235, -32.5, 524, -38), (9.259, -32, 474, -16),
             (9.288, -43, 700, -6), (9.312, -41.5, 700, -16), (9.326, -39.5, 384, -10),
             (9.583, -44.5, 620, -11), (9.615, -40, 745, -30), (9.67, -34, 630, -17),
             (9.71, -34.5, 346, -14.5), (9.746, -47, 750, -15), (9.82, -51, 454, -15)]
    build_cycles, fall_cycles = 1.48, 21  # time scales in cycles of the centre pitch
    faint = scatter(count=30, low=(-63, 250, -20), high=(-54, 950, -6))
    rows = np.vstack([clear, faint])
    cycle_ms = 1000 / rows[:, [2]]
    rows = np.hstack([rows, cycle_ms * (build_cycles, fall_cycles)])
    return blows(rows, 1.61, (60, 130), edge_slow=6.1, crack_db=18, sweep_ms=2.5)


def notes():
    """Sliding friction with short noise tones, joined by the snaps and flaps of the sheets."""
    return place(slide() + noise_tones() + snaps() + flaps(), pan_db=-0.17)


def stereo(near):
    """Desk colour, then a fixed stereo filter sets level and phase between left and right, and early echoes."""
    # desk top and hands colour everything near them: (frequency [Hz], width [Hz], gain [dB])
    desk_peaks = [(339.4, 22, 7.5), (477.3, 24, 7.5), (630, 66, -8.5), (787, 6.7, 0.5), (952, 36, 4),
                  (1160, 110, -3), (1604, 150, 4), (2160, 73, 4.5), (2370, 11, -1.5), (3100, 31, 5),
                  (3360, 23, 1.5), (4200, 54, -1)]
    # level, left against right: (frequency [Hz], left minus right [dB])
    lean = [(450, 0.5), (700, 7), (870, -7.5), (1000, 5.5), (1200, -5), (1700, 1), (1900, -4.5),
            (2150, 5.5), (2600, -8), (3500, -3.5), (5000, -1.5), (6500, 0)]
    # phase, left against right: (frequency [Hz], left leads by [rad])
    lead = [(0, 0), (600, 0), (800, -1), (1200, -1), (1600, 0), (5200, .5), (7300, np.pi),
            (16750, 4 * np.pi)]
    walls_db, walls_t60_s, walls_hz = -7.5, 0.14, 4600
    size = next_fast_len(N + SR // 2)
    hz = np.arange(size // 2 + 1) * SR / size
    desk = 1
    for f, width, db in desk_peaks:  # causal peaks and dips
        above = f ** 2 - hz ** 2 + 1j * hz * width * undb(db / 2)
        below = f ** 2 - hz ** 2 + 1j * hz * width / undb(db / 2)
        desk = desk * above / below
    # each channel takes half of the difference
    half = undb(np.interp(hz, *np.transpose(lean)) / 2) * np.exp(.5j * np.interp(hz, *np.transpose(lead)))
    t = np.arange(SR // 4) / SR
    tail = rng.standard_normal((2, len(t))) * 1000 ** (-t / walls_t60_s) * (t > .002)
    echo = band(tail, 420, walls_hz)
    echo = echo / np.sqrt(np.sum(echo ** 2) / 2)  # unit energy per channel
    echo = rfft(undb(walls_db) * echo * np.sqrt(2 * walls_hz / SR), size)
    return irfft(rfft(near, size) * desk * (np.array([half, 1 / half]) + echo), size)[:, :N]


def scene():
    """Everything at the desk through the desk colour and stereo filter, over the room."""
    return room() + stereo(rack() + keys() + notes())


def record(dry):
    """The phone cuts the deepest bass and the top."""
    bass_hz, top_hz = 42, 15900
    low_cut = signal.sosfilt(signal.butter(3, bass_hz, "high", fs=SR, output="sos"), dry)
    return signal.sosfilt(signal.ellip(10, .2, 80, top_hz, fs=SR, output="sos"), low_cut)


dry = scene()
out = record(dry)
digitize_waveform(out)
```